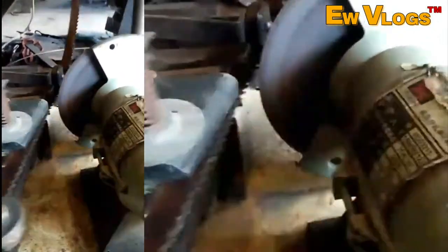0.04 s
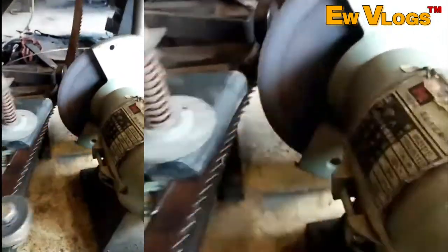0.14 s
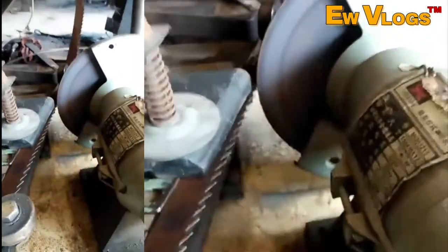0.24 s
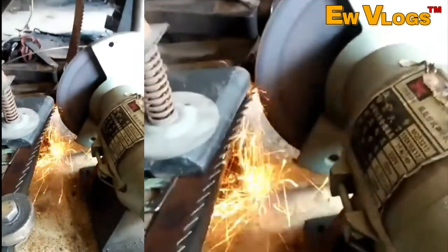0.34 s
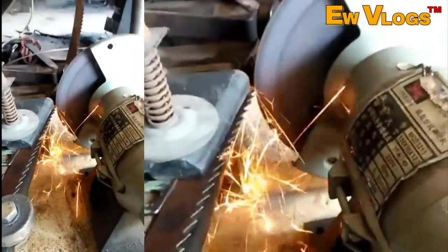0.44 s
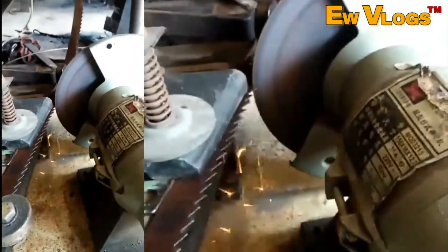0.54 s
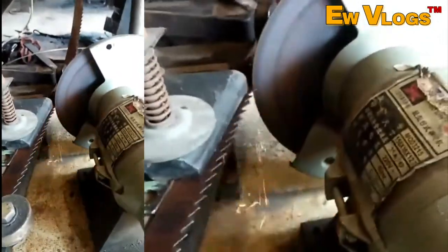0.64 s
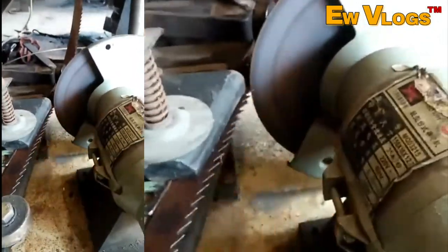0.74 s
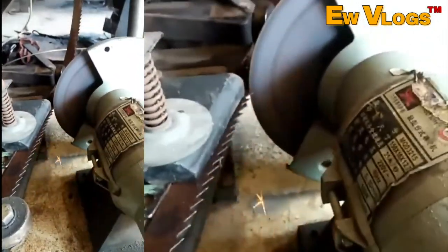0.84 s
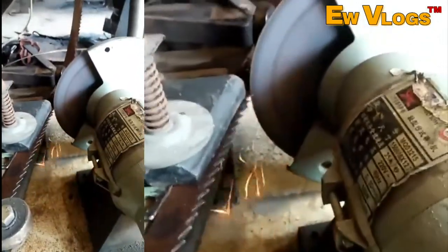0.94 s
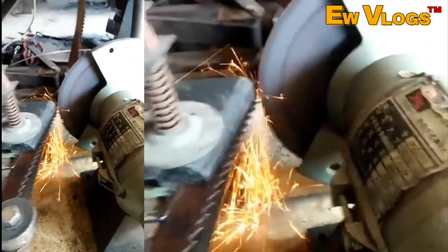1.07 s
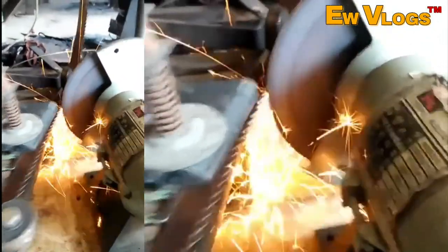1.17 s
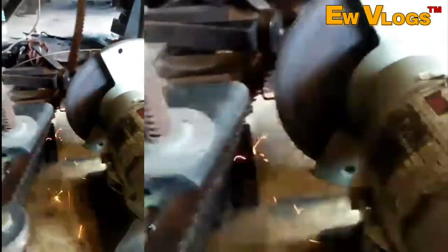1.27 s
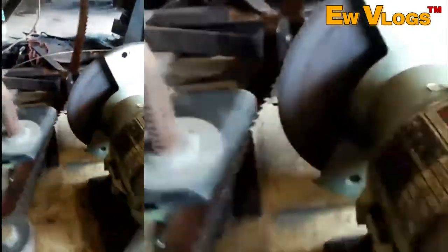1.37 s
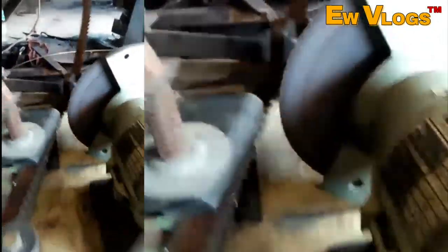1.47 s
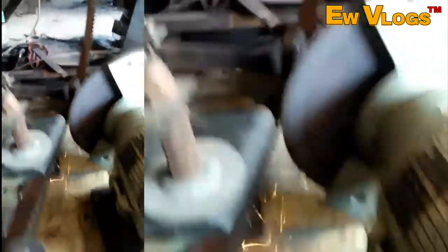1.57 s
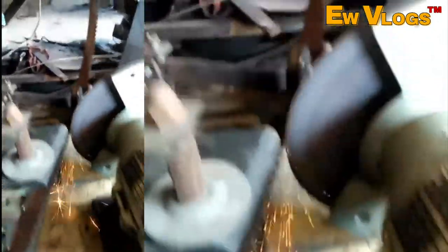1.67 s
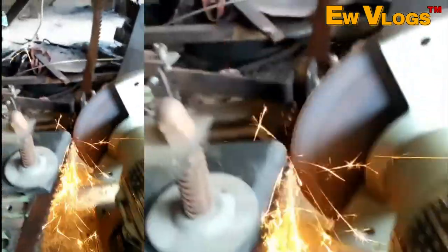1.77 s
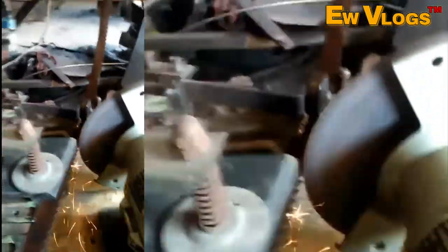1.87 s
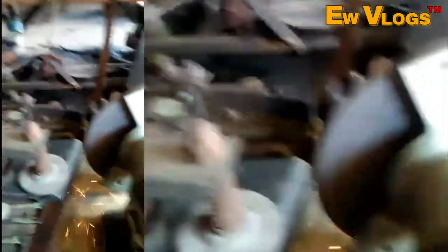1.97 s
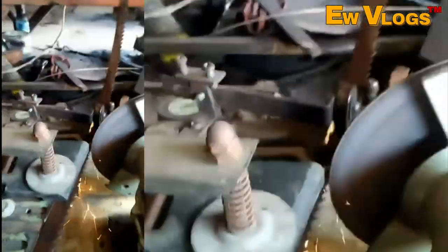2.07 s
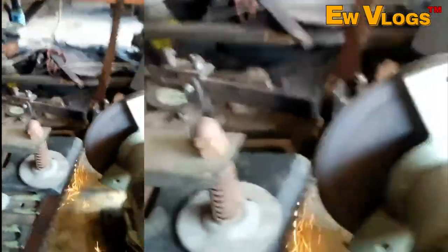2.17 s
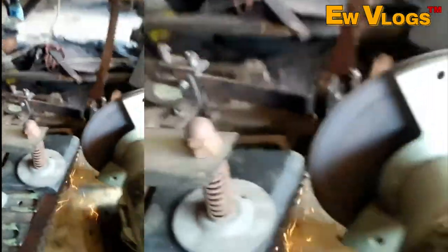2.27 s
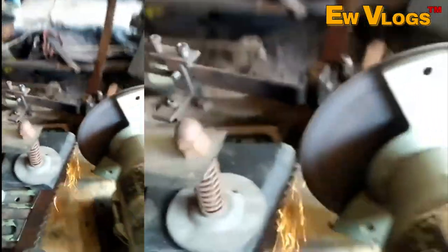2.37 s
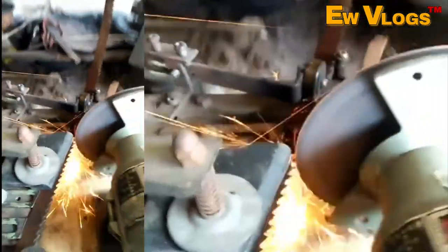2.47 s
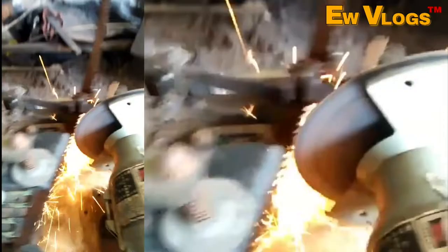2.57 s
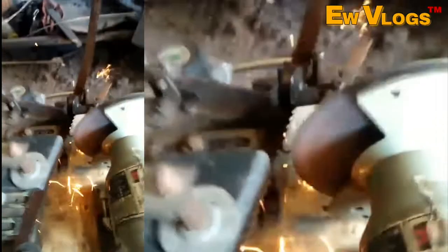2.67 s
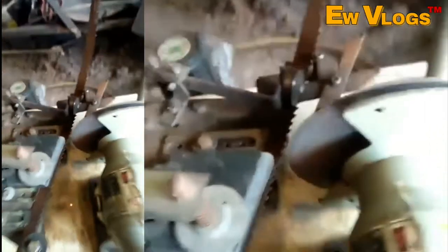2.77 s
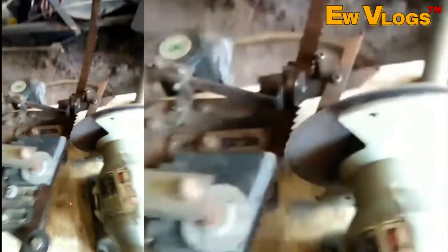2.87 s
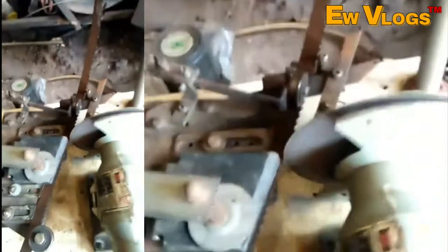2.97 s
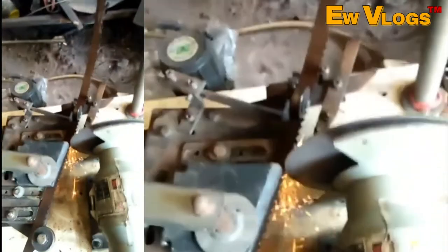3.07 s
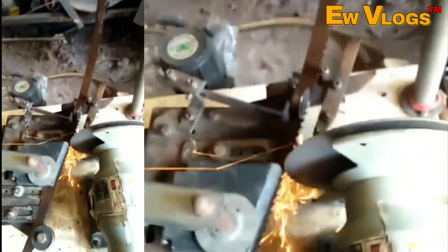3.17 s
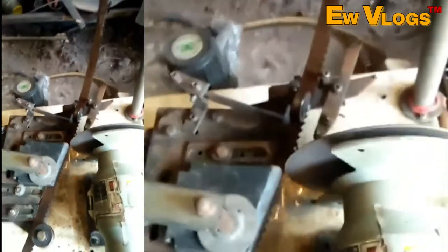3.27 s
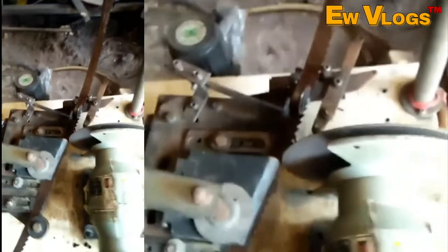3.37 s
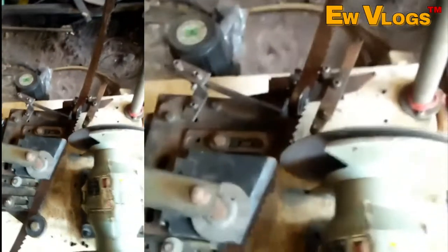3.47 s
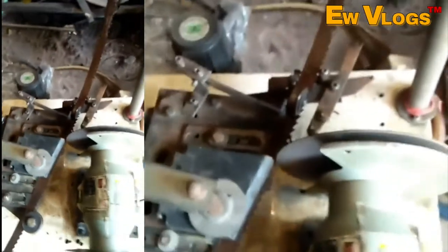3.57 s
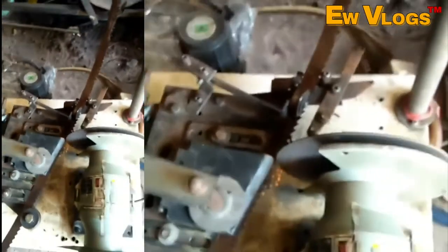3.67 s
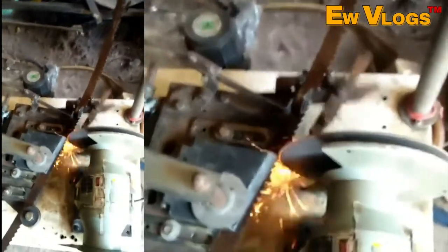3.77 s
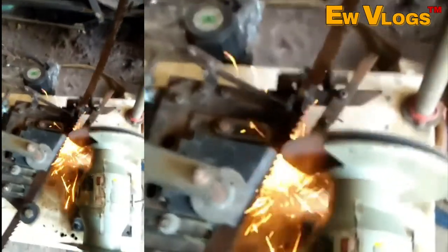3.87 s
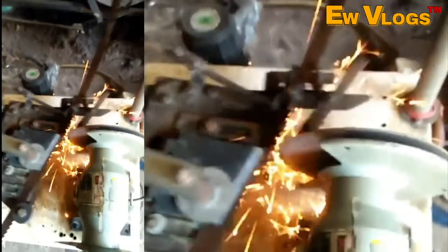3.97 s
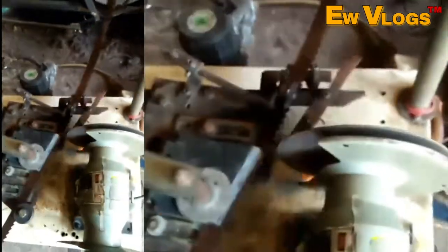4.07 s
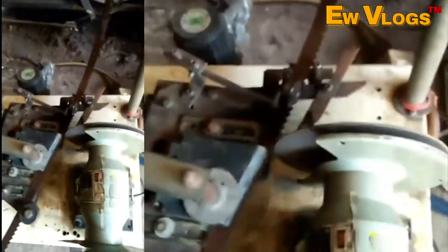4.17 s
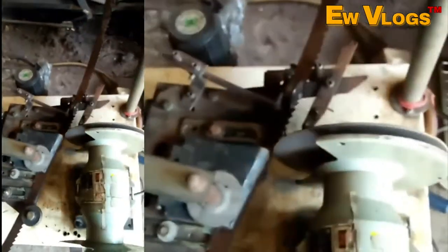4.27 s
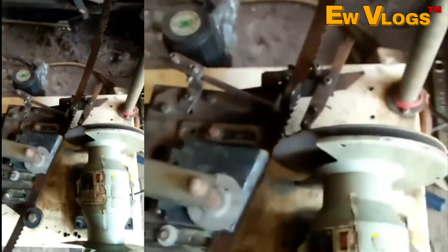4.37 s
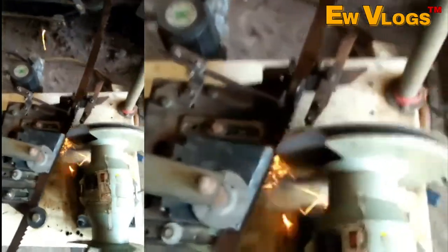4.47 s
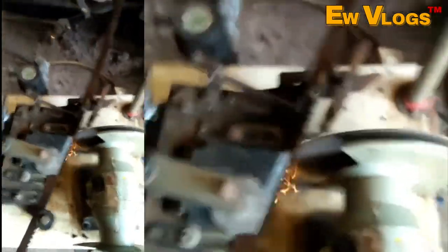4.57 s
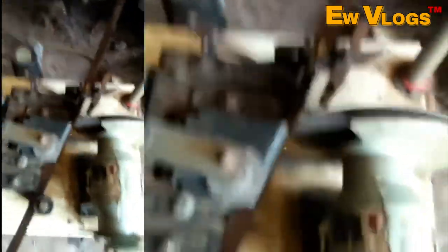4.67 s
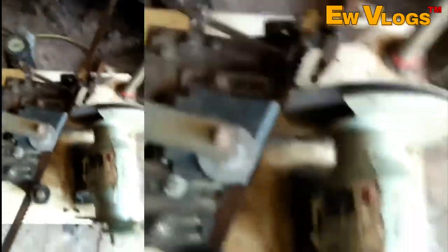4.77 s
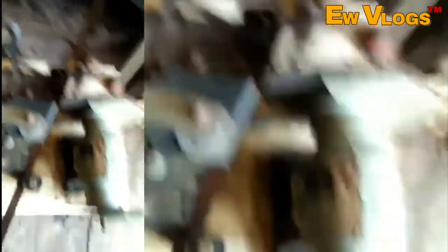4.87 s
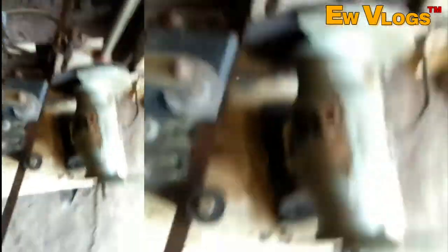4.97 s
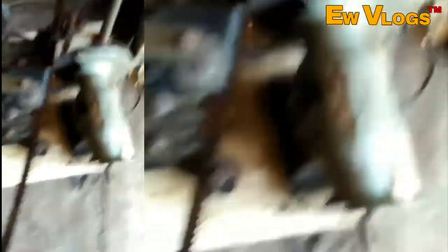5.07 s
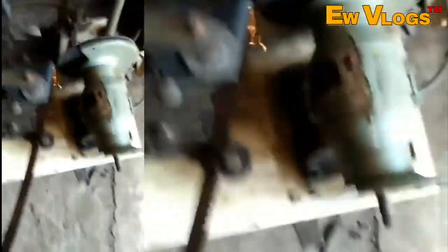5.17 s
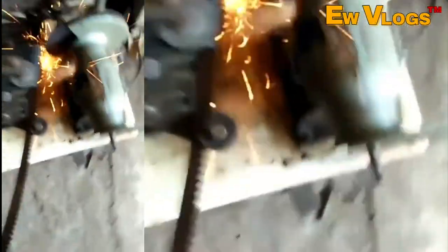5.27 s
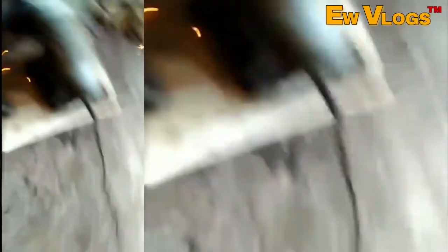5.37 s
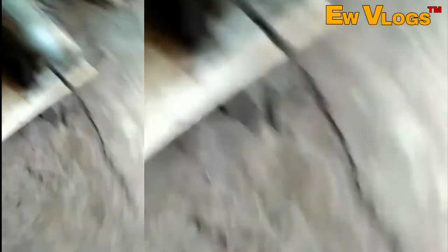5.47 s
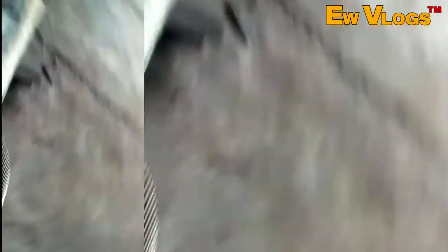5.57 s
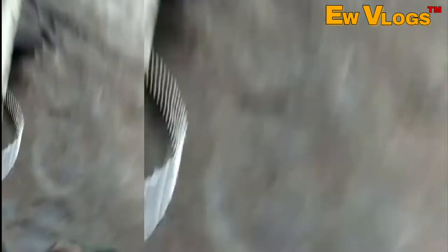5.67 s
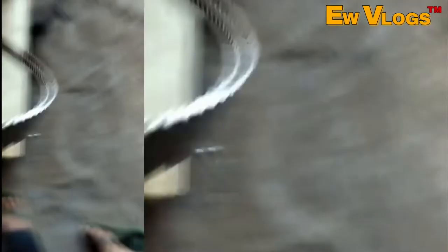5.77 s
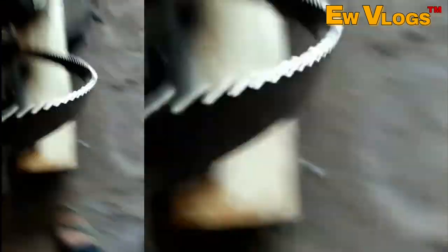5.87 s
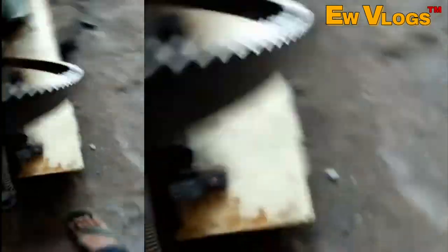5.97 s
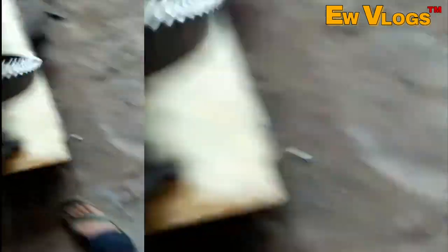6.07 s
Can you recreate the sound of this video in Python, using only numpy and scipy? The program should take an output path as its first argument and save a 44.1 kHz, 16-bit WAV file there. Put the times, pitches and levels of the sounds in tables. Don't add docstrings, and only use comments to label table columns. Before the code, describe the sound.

Gritty metal grinding comes in separate bites: two long roaring ones early, the first thinning into a regular fast buzz with a thin high squeal, then rapid light scuffs broken by brief, loud rasps. The steel blade rings, walls return a short diffuse echo, and a motor rumbles quietly beneath with mechanical clinks and dull knocks. Close microphone, overloaded at the peaks.

```python
import sys
import numpy as np
from scipy import signal
from scipy.io import wavfile
from scipy.ndimage import uniform_filter1d

SR = 44100
rng = np.random.default_rng(int(sys.argv[2]) if len(sys.argv) > 2 else 0)


def natural_amplitude(level_db):
    exponent = np.asarray(level_db, float) / 20
    return 10 ** exponent


def wav_record(signal):
    frames = np.transpose(np.atleast_2d(signal))
    bounded = np.clip(frames, -1, 1)
    quanta = np.round(bounded * 32767).astype(np.int16)
    wavfile.write(sys.argv[1], SR, quanta)


N = 269449

TURNS_PER_S = 49.4
# (time [s], lead [turns])
LAG = [(.5, 0.34), (.65, 0.27), (.75, 0.12), (1.25, 0.16), (1.75, -0.28), (1.85, -0.23), (2.05, -.52),
       (2.65, -0.95), (5.95, -0.16)]

# (time [s], level [dB], pressure [0-1], plunge into the gullet [0-1])
LONG_CUT_1 = [
    (.5, 1, 0.82, 0.24),
    (.6, -1, 0.68, 0.16),
    (.75, 0, 0.44, 0.12),
    (.95, -4, 0.36, 0.28),
    (1.08, -2.5, 0.36, 0.15),
    (1.2, -1, 0.44, 0.39),
    (1.26, 3.5, 0.4, 0.26),
    (1.327, -2.5, 1, 0.72),
    (1.41, 1, 1, 0),
]
LONG_CUT_2 = [
    (1.744, 1, 0.59, 0.39),
    (1.83, 2.5, 0.49, 0.39),
    (1.92, -0.5, 0.95, 0.48),
    (2.05, 0.4, 0.73, 0.29),
    (2.18, 2.5, 0.46, 0.4),
    (2.46, -0.9, 0.69, 0.38),
    (2.55, 4, 0.56, 0.28),
    (2.694, -1, 0.77, 0.59),
    (2.782, 1.5, 0.76, 0.033),
]
SHORT_CUTS = [
    [(0.0, 1.5, 0.88, 0.71), (.03, -7, 0.83, 0.32), (.12, -16.5, 0.55, 0.22)],
    [(3.985, 2.9, 0.59, 0.38), (4.062, -1.7, 0.93, 0.62), (4.14, 1.7, 0.43, 0.042)],
    [(5.362, 4, 0.49, 0.23), (5.431, -4, 1, 0.43), (5.501, -1.5, 0.67, 0.26), (5.57, -11.5, 1, 0.5)],
    [(5.963, 0.29, 0.53, 0.24), (6.036, 0, 0.69, 0.049), (6.11, 1, 0.4, 0.39)],
]
# (light flat touch [dB], added by full pressure [dB], added by full plunge [dB])
CUT_DB = np.array([(-6.5, -9.0, -8.0), (-9.5, 4.0, -12.5), (-22.5, 5.5, 18.0)])
BITE_SHARE = np.array([[.65], [1.], [1.1]])
FILL_POWER = np.array([[1.8], [1.8], [1.1]])
BLOW = np.array([[10.], [10.], [4.]])
# (time [s], half length [s], loss [dB])
LIFTS = [
    (0.766, 0.0066, 4),
    (1.82, .006, 10),
    (2.15, 0.0045, 12),
    (2.207, 0.0045, 5),
    (2.255, .005, 5),
    (2.284, .004, 1),
    (2.514, 0.0087, 3),
    (2.537, 0.0086, 8),
    (2.578, 0.0048, 21),
    (2.62, .006, 12),
]

# (time [s], level [dB], grip [0-1])
FIRST_TOUCHES = [
    (.4225, -15.5, 0.59),
    (.4623, -13.5, 0.43),
    (1.729, -15, 0.63),
]
# (time [s], level [dB], grip [0-1])
GLANCING_TOUCHES = [(3.2455, -19, 0.65), (3.2615, -10.5, 0.6), (3.3255, -14, 0.57), (3.336, -13, 0.6),
                    (3.3735, -13, 0.47), (3.345, -19, 0.7), (3.4015, -7.5, 0.3), (3.4427, -12, 0),
                    (3.7356, -12, 0.3), (3.7554, -16.5, 0.55), (3.788, -10, 0.48), (3.7955, -16, 0.1),
                    (3.817, -23, 0), (3.8252, -18.5, 0.74), (3.836, -14, 0.1), (3.868, -16, 0),
                    (3.8973, -21, 0.2), (3.908, -9.5, 0.37), (3.9146, -22, 1), (3.9475, -10, 0.64),
                    (3.968, -13, 0.87),
                    (4.477, -27, 0.48), (4.516, -17, 0.37), (4.556, -19, 0.35), (4.598, -16, 0.3),
                 (4.61, -13, 0.87), (4.618, -8, 0.28), (4.638, -15, 0.58), (4.6493, -9, 0.77),
                 (4.661, -12, 0.47), (4.6827, -8, 0.59), (4.6995, -8, 0.41), (4.73, -16, 0.64),
                 (4.823, -20.5, 0.42), (4.862, -14.5, 0.16), (4.872, -18, 0.64), (4.955, -23, 0.055),
                 (4.9637, -30.5, .1), (4.993, -41, .1), (5.076, -43, .1),
                    (5.115, -32, 0.2), (5.127, -39, 0.24), (5.155, -18.5, 0.21), (5.165, -17.5, 0.15),
                  (5.195, -17.5, 0.53), (5.205, -14, 0.39), (5.226, -28, 0.52), (5.2778, -17.5, 0.62),
                  (5.2841, -9.5, 0.33), (5.326, -18, 0.61), (5.3367, -8.5, 0.31), (5.347, -13.5, 0.78)]
# (time [s], level [dB], grip [0-1], length against a glancing touch [1])
SKIMS = [(3.2513, -2.5, 0.27, 1.05), (3.2706, -7, 0.59, 1.05), (3.2896, -5.5, 0.5, 1.05),
         (3.3112, -9, 0.63, 1.05), (3.3294, -2, 0.4, 1.05), (3.3517, -11, 0.8, 1.05),
         (3.367, -0.5, 0.37, 1.05), (3.3943, -9, 0.4, 1.05), (3.4145, -4.5, 0.5, 1.05),
         (3.4324, -13, 0.46, 1.05), (3.454, -5, 0.57, 1.05), (3.475, -15.5, 0.83, 1.05),
         (3.495, -14, 0.45, 1.3), (3.5347, -7.5, 0.68, 1.05), (3.555, -10.5, 0.45, .9),
         (3.5952, -20, 0.44, 1.05), (3.616, -22, 0.5, 1.05), (4.6906, -5, 0.58, 1.05),
         (4.72, -6.5, 0.47, 1), (4.7403, -2, 0.4, 1.05), (4.759, -4, 0.51, 1.05), (4.78, -9, 0.5, 1.05),
         (4.7975, -6, 0.33, 1.3)]
SKIM_DB = -5
# (glancing touch [dB], added by full grip [dB])
TOUCH_DB = np.array([(-9.0, 3.0), (-14.5, 21.0), (-35.0, 34.5)])
TOUCH_S = np.array([[.0026], [.0032], [.0032]])
HEAD_ON_S, LEAD_SHARE = 0.0014, .6
DRAG, DRAG_S = 0.4, 0.014
# (start [s], end [s], fizz level [dB], rise and fall [s])
BRUSHES = [
    (3.227, 3.507, -38, 0.022),
    (3.52, 3.662, -58, .03),
    (3.714, 3.926, -44.5, .015),
    (4.445, 4.6, -56.5, 0.015),
    (4.6, 4.9, -42, 0.021),
    (4.95, 5.364, -55, .06),
]
BRUSH_DB = np.array([[0.], [9.], [-12.]])

# (frequency [Hz], width [Hz], level [dB])
RING_1 = [(935, 450, -2.5), (2180, 30, -5), (2590, 30, -30), (6800, 77, -28), (7650, 230, -20.5),
          (8500, 52, -17.5), (9020, 37, -24), (1975, 85, 6.5), (4880, 90, -12), (5670, 50, -12),
          (5795, 8, 3), (6110, 90, -11)]
RING_2 = [(592, 7.6, -4), (877, 400, -7), (1430, 53, -31), (1984, 45, -0.5), (2500, 160, -11),
          (2970, 19, -6.5), (3870, 69, -27), (4110, 14, -55), (4700, 57, -46), (6050, 23, -14),
          (5980, 130, -33)]
RING_4 = [(833, 68, -2.5), (1480, 51, -7.5), (1925, 52, -4.5), (2234, 33, 3.5), (2440, 27, 0),
          (4400, 190, -35.5), (6040, 310, -21), (6790, 250, -18), (7600, 110, -25), (8060, 45, -14),
          (8900, 160, -40)]
RING_5 = [(928, 27, -1), (1440, 220, -17.5), (1930, 81, -5.5), (2264, 14, -0.5), (2480, 31, -29),
          (2600, 24, -12), (5740, 27, -19), (6050, 54, -22), (6790, 95, -18), (7660, 140, -22.5),
          (8100, 120, -24)]
RING_6 = [(1923, 130, 2.5), (2300, 22, 2), (2350, 18, -5), (4700, 25, -25), (4810, 59, -10.5),
          (5810, 35, -12), (6800, 85, -19.5), (7760, 44, -11), (7940, 69, -17), (8200, 36, -20),
          (9100, 200, -17.5)]
RING_7 = [(944, 440, -7), (2780, 380, -22), (1435, 65, -6), (1903, 14, 8.5), (2076, 39, -2),
          (4840, 69, -16.5), (5740, 35, -46), (6110, 92, -13), (6810, 180, -18), (7460, 95, -16),
          (8390, 42, -13)]
RING_8 = [(926, 370, 2), (2257, 35, 4.5), (6920, 120, -33), (7630, 200, -16.5), (8400, 220, -17.5),
          (8770, 130, -17), (1940, 360, 3), (4800, 360, -12), (5600, 69, -22), (5740, 170, -6),
          (5950, 260, -9.5)]
RING_9 = [(600, 29, -3), (854, 310, -2.5), (1514, 110, -9), (1860, 34, -10.5), (2500, 57, -1),
          (3055, 20, -7), (4730, 130, -25), (6080, 200, -16), (7200, 71, -23), (7500, 89, -33),
          (8600, 110, -30)]
RING_10 = [(970, 21, -2), (1460, 180, -14), (1944, 94, 0), (2245, 16, 7), (4920, 130, -20),
           (5850, 110, -15), (6800, 90, -15.5), (8000, 200, -19), (8100, 150, -16), (9050, 280, -16)]
RING_11 = [(770, 30, -4.5), (923, 45, 0.5), (1420, 150, -19), (1920, 49, 4.5), (2430, 30, -22),
           (3030, 52, -14), (4650, 62, -17), (6100, 57, -14), (7300, 36, -14), (8160, 66, -15)]
RING_12 = [(1016, 120, -6), (1260, 21, 0), (1480, 34, 4), (1970, 140, -3), (2384, 38, 3.5), (2680, 50, -7),
           (3760, 50, -23.5), (4910, 120, -17.5), (5500, 72, -17), (6940, 78, -19), (7530, 58, -26)]
RING_13 = [(1050, 110, 3.5), (1470, 43, -5), (2000, 130, 5), (2180, 32, 0), (2450, 140, 7), (3010, 27, -3),
           (3890, 81, -19), (4900, 70, -19), (5650, 51, -12), (6120, 40, -10), (6880, 55, -16),
           (8350, 130, -15)]
RING_14 = [(1023, 130, 3), (1486, 56, -13), (2016, 230, -0.5), (2456, 124, 3.5), (3850, 68, -16),
           (4865, 67, -9.5), (5600, 40, -19), (5920, 190, -17.5), (6900, 78, -27), (7560, 96, -21),
           (8320, 110, -18)]
# (frequency [Hz], width [Hz], level [dB])
GUARD = [(10000, 94, -2), (11000, 99, -1), (11600, 150, -2), (12470, 190, -3.5)]
# (frequency [Hz], level [dB per Hz])
GRIT = [(59, -53), (100, -35.5), (363, -11.5), (590, -4), (669, -8.5), (1040, -2.5), (1660, -1.5),
        (1970, 0.5), (2480, 1), (3330, -22.5), (5900, -19.5), (6550, -17.5), (10700, -25.5), (14800, -39.5),
        (15700, -44)]
SKIM = [(100, -15.5), (600, -9), (900, -6), (1400, -11.5), (2300, -0.5), (3100, -21.5), (3500, -31.5),
        (5100, -22.5), (5600, -17), (8800, -19), (9700, -23.5), (10500, -18.5), (13200, -24.5),
        (14000, -44), (15600, -45)]
GRAZE = [(100, -14), (600, -11.5), (900, 0), (1400, -19), (2300, -4), (3000, -24.5), (3500, -34.5),
         (5000, -28), (5600, -21.5), (8800, -21), (9500, -30.5), (10500, -24), (13200, -29), (14000, -46),
         (15600, -42)]
FAINT = [(100, -14), (900, -14), (2300, -8), (3000, -29), (4000, -48), (5100, -48), (5600, -12),
         (7500, -26), (10000, -24), (13200, -25), (15600, -43)]
# (resonances [Hz, Hz, dB], grit noise [Hz, dB per Hz])
RINGS = [(RING_11, GRIT), (RING_1, GRIT), (RING_8, GRIT), (RING_7, GRIT), (RING_12, GRIT), (RING_2, GRIT),
         (RING_9, GRIT), (RING_13, GRIT), (RING_14, GRIT), (RING_2, GRIT), (RING_4, SKIM), (RING_7, GRIT),
         (RING_5, FAINT), (RING_5, GRAZE), (RING_10, GRAZE), (RING_7, GRIT), (RING_6, GRIT)]
# (damping factor [1], echo [dB], guard [dB])
STAGES = [(8.2, -4, -44), (6.7, -9, -23.5), (1.4, -11, -19), (6.5, -6, -31), (1.9, -14, -25.5),
          (5.7, -12.5, -33), (2, -10.5, -25), (2.5, -8, -20), (2.1, -8, -21), (4.6, -7.5, -41),
          (1.9, -11, -31), (14, -5.5, -26), (5, -14, -29), (3.2, -16, -30), (3.9, -14.5, -26),
          (7, -4.5, -35), (6.4, -4.5, -19.5)]
STARTS = [0, .4, .726, 1.27, 1.7, 1.87, 2.1, 2.27, 2.39, 2.64, 3.2, 3.984, 4.4, 4.604, 5.0, 5.361, 5.9, N /
          SR]

# (frequency [Hz], t60 [s])
SHOP = [(200, 0.092), (700, 0.48), (1700, 0.59), (4600, 0.47), (9000, 0.45), (12000, 0.34), (15000, 0.42)]

# (frequency [Hz], level [dB per Hz])
IDLE = [(24, -63.5), (40, -52), (85, -24), (170, -21.5), (298, -5), (355, -26), (568, -1.5), (1000, 9.5),
        (1530, 2.5), (1690, 2.5), (1870, -4), (2920, -9.5), (3220, -22), (7870, -34), (9500, -39),
        (15000, -44)]
# (time [s], level [dB])
IDLE_DB = [(0, -44), (.4, -35), (1.7, -28), (3.1, -31), (3.7, -24.5), (4.45, -35), (5.05, -39.5),
           (5.9, -36)]
# (frequency [Hz], width [Hz], level [dB])
DRONE = [(308.5, 7, -51), (450, 24, -41.5), (587, 17, -43), (759, 35, -38.5), (947, 15, -40),
         (1242, 8.6, -44.5)]
WANDER, WAVER_DB = .03, 3.
# (time [s], peak level [dB], pitch [Hz], t60 [s])
CLINKS = [(0.413, -18.5, 740, 0.098), (0.497, -12, 920, 0.15), (2.753, 0.5, 2637, 0.069),
          (3.005, -15.5, 780, 0.083), (3.146, -21, 1020, 0.037), (3.165, -19, 1000, 0.031),
          (3.226, -21, 1194, 0.12), (3.6, -39, 430, 0.32), (3.658, -23, 464, 0.35),
          (3.949, 3.5, 1010, 0.0068), (4.485, -22, 950, 0.063), (5.875, -25, 1220, 0.15),
          (5.944, -16, 694, 0.021)]
# (time [s], peak level [dB], pitch [Hz], t60 [s])
THUMPS = [
    (0.594, -26, 125, 0.078),
    (1.292, -11, 220, 0.029),
    (1.349, -23, 178, 0.05),
    (2.098, -4, 107, 0.029),
    (2.409, -28, 100, 0.1),
    (2.656, -38, 164, 0.11),
    (3.944, -7.5, 200, 0.014),
    (4.029, -39, 171, 0.096),
    (5.429, -18, 108, 0.12),
]

# (time [s], level [dB])
SQUEAL = [(.5, -36), (.72, -41), (.9, -31), (1.0, -25), (1.15, -15), (1.215, -22), (1.26, -36)]
SQUEAL_HZ, SQUEAL_FADE_DB = 5797.5, 10.
# (time [s], level [dB])
BEADS = [(.72, -16), (.8, -6.5), (.95, -12), (1.0, -5.5), (1.18, -5.5), (1.26, -12)]
BEAD_TURN = 0.04006
# (frequency [Hz], level [dB], t60 [s], rise [s])
BEAD_MODES = [(1980, 1.5, 0.042, 0.0017), (2140, -6.5, 0.037, 0.0013), (4860, -9, .04, .0006),
              (5810, -3.5, 0.049, 0.00035), (6100, -5.5, 0.019, 0.00023)]


def read(points, hz):
    f, value = np.transpose(points)
    return np.interp(np.log(hz + 1), np.log(f + 1), value)


def evened(x):
    return x / np.sqrt(np.mean(x ** 2) + 1e-20)


def add(mix, s, sound):
    at = round(s * SR)
    part = mix[..., at:at + sound.shape[-1]]
    part += sound[..., :part.shape[-1]]


def noise_field(db_of, frames, size):
    hz = np.fft.rfftfreq(size, 1 / SR)
    a, b, c = rng.standard_normal((frames, len(hz), 3)).T
    spectra = (a + 1j * b) * natural_amplitude(db_of(hz[:, None], c))
    return signal.istft(spectra, nperseg=size, noverlap=size * 3 // 4)[1]


def high_spot(t):
    return (TURNS_PER_S * t + np.interp(t, *np.transpose(LAG)) - .035) % 1


def chatter(blows):
    bounces = np.zeros(111)
    bounces[::22] = np.hanning(8)[1:-1]
    fizz, blade, frame = blows
    return np.array([fizz, np.convolve(blade, bounces)[:blows.shape[1]], frame])


def cuts(fresh):
    t, force = np.arange(N) / SR, np.zeros((3, N))
    angle = high_spot(t)
    face = rng.standard_normal(893)[(angle * 893).astype(int)]
    landed = np.diff(angle > .02, prepend=True) & (angle > .02)
    blows = chatter(BLOW * landed)
    for rows in [LONG_CUT_1, LONG_CUT_2] + SHORT_CUTS:
        s, *columns = np.transpose(rows)
        now = slice(round(s[0] * SR), round(s[-1] * SR))
        db, press, plunge = (np.interp(t[now], s, c) for c in columns)
        press = np.clip(press, .02, 1)
        width = BITE_SHARE * (0.096 + 0.78 * press)
        bite = np.tanh(angle[now] / 0.0053) * np.exp(-(angle[now] / width) ** 4)
        fill = press ** FILL_POWER
        release = np.clip((s[-1] - t[now]) / 0.036, 0, 1)
        shape = (fill + (1 - fill) * bite) * release
        same = .95 - .8 * press
        grit = np.sqrt(same) * face[now] + np.sqrt(1 - same) * fresh[now]
        grit = grit + 0.71 * (1 - press) ** 2 * blows[:, now]
        add(force, s[0], grit * shape * natural_amplitude(db + CUT_DB @ [np.ones_like(db), press, plunge]))
    for s, half, db in LIFTS:
        force = force * natural_amplitude(-db * np.exp(-((t - s) / half) ** 2))
    return force


def causal(gain):
    log = np.log(np.maximum(np.r_[gain, gain[-2:0:-1]], 1e-5))
    taps = np.fft.ifft(np.exp(np.conj(signal.hilbert(log)))).real[:4096]
    return taps / np.linalg.norm(taps)


def steel(modes, grit, damping, grit_db=-10, wider=1.0, per_khz=4.9, low_hz=1650, high_hz=3300):
    hz = np.fft.rfftfreq(8192, 1 / SR)
    power = natural_amplitude(2 * (read(grit, hz) + grit_db))
    for f, width, db in modes:
        damped = wider * width + damping * per_khz * f / 1000
        power += natural_amplitude(2 * db) * width / damped / (1 + (2 * (hz - f) / damped) ** 2) ** 2
    frame = 1 / (1 + (hz / low_hz) ** 12)
    fizz = 1 - 1 / (1 + (hz / high_hz) ** 12)
    blade = abs(1 - frame - fizz)
    return np.array([causal(np.sqrt(power * share)) for share in (fizz, blade, frame)])


def grinding(grain_db=1.5, far_damping=5.2):
    fresh = evened(rng.standard_normal(N) * natural_amplitude(grain_db * rng.exponential(1, N)))
    force, near, far = cuts(fresh) + touches(fresh), np.zeros(N), np.zeros(N)
    for (modes, grit), (damping, echo_db, guard_db), s, end in zip(RINGS, STAGES, STARTS, STARTS[1:]):
        modes = modes + [(hz, width, db + guard_db) for hz, width, db in GUARD]
        part = force[:, round(s * SR):round(end * SR)]
        close = steel(modes, grit, damping)
        blurred = steel(modes, grit, damping + far_damping)
        add(near, s, signal.oaconvolve(part, close, axes=1).sum(0))
        add(far, s, natural_amplitude(echo_db) * signal.oaconvolve(part, blurred, axes=1).sum(0))
    return near, far


def unsteady(x, spread_db=2.):
    t, z = signal.stft(x, SR, nperseg=512, noverlap=384)[1:]
    patches = uniform_filter1d(rng.standard_normal(z.shape[::-1]).T, size=3, axis=0)
    patches = evened(uniform_filter1d(patches, size=20, axis=1))
    regular = (t > BEADS[0][0]) & (t < BEADS[-1][0])
    spread = spread_db * np.where(regular, .3, 1)
    z = z * natural_amplitude(spread * patches - spread ** 2 / 9)
    return signal.istft(z, nperseg=512, noverlap=384)[1][:N]


def shop(x):
    t = np.arange(500) * 64 / SR
    tail = noise_field(lambda hz, c: -60 * t / np.maximum(read(SHOP, hz), .1), frames=500, size=256)
    tail *= np.clip((np.arange(len(tail)) / SR - .004) / 0.035, 0, 1)
    return signal.fftconvolve(x, tail / np.linalg.norm(tail))[:N]


def drone(t, hz, width, db):
    waver = evened(np.interp(t, np.linspace(0, t[-1], 25), rng.standard_normal(25)))
    drift = np.interp(t, np.linspace(0, t[-1], 31), rng.standard_normal(31))
    pitch = hz * (1 + WANDER * drift)
    poles = [np.exp(-2 * np.pi * width / SR)] * 2
    hum = signal.lfilter([1], np.poly(poles), [1, 1j] @ rng.standard_normal((2, N)))
    tone = (hum * np.exp(2j * np.pi * np.cumsum(pitch) / SR)).real
    return natural_amplitude(db + 29.5 + WAVER_DB * waver) * evened(tone)


def idle(patchy_db=1.4):
    t = np.arange(N) / SR

    def rumble_db(hz, c):
        patches = evened(uniform_filter1d(uniform_filter1d(c, 6, 0), 8, 1))
        return read(IDLE, hz) + patchy_db * patches

    out = evened(noise_field(rumble_db, frames=N // 256 + 5, size=1024)[:N])
    for hz, width, db in DRONE:
        out += drone(t, hz, width, db)
    out *= natural_amplitude(np.interp(t, *np.transpose(IDLE_DB)))
    u = t[:6000]
    for s, db, hz, t60 in CLINKS + THUMPS:
        decay = natural_amplitude(db - 60 * u / max(t60, .01))
        add(out, s, decay * np.tanh(u * hz / 0.46) * np.sin(2 * np.pi * hz * u))
    return out


def touches(fresh):
    u, force = np.arange(2000) / SR, np.zeros((3, N))
    hit = chatter(BLOW * (np.arange(len(u)) == 40))
    glancing = GLANCING_TOUCHES
    groups = [(FIRST_TOUCHES, .8, HEAD_ON_S), (glancing, .05, TOUCH_S)]
    for s, db, grip, stretch in SKIMS:
        groups.append(([(s, db + SKIM_DB, grip)], .06, stretch * TOUCH_S))
    for rows, blow, length in groups:
        swell = (u / length) ** 2 * np.exp(2 - 2 * u / length)
        trail = DRAG * np.tanh(u / length) * np.exp(-u / DRAG_S)
        for s, db, grip in rows:
            at = round(s * SR)
            scuff = (swell + trail) * fresh[at:at + len(u)]
            level = natural_amplitude(db + TOUCH_DB @ [[1], [grip]])
            add(force, s - LEAD_SHARE * np.min(length), (scuff + blow * hit) * level)
    t = np.arange(N) / SR
    for start, end, db, edge in BRUSHES:
        fade = np.clip(np.minimum(t - start, end - t) / edge, 0, 1)
        force += natural_amplitude(db + BRUSH_DB) * fresh * fade
    return force


def squeal():
    t = np.arange(N) / SR
    drift = uniform_filter1d(rng.standard_normal(N), size=2000)
    level_db = np.interp(t, *np.transpose(SQUEAL), left=-120, right=-120)
    level_db = level_db - SQUEAL_FADE_DB * high_spot(t)
    tone = np.sin(2 * np.pi * np.cumsum(SQUEAL_HZ + 150 * drift) / SR)
    return uniform_filter1d(natural_amplitude(level_db), size=30) * tone


def beads():
    t = np.arange(N) / SR
    landed = np.diff((high_spot(t) - BEAD_TURN) % 1, prepend=0) < -.5
    strikes = landed * natural_amplitude(np.interp(t, *np.transpose(BEADS), left=-120, right=-120))
    u, ring = t[:1200], 0
    for hz, db, t60, rise in BEAD_MODES:
        ring = ring + natural_amplitude(db - 60 * u / t60) * np.tanh(u / rise) * np.sin(2 * np.pi * hz * u)
    return signal.oaconvolve(strikes, ring)[:N]


def scene():
    near, far = grinding()
    return (unsteady(near) + beads() + squeal() + shop(far) + idle())[None]


def top_cut(x):
    return signal.sosfilt(signal.butter(12, 15730, fs=SR, output="sos"), x)


def record(dry):
    ceiling, knee = .72, 7.
    uneven = dry + 0.16 * np.tanh(dry ** 4)
    clipped = uneven / (1 + abs(uneven / ceiling) ** knee) ** (1 / knee)
    band = signal.firwin(1023, [22, 15720], pass_zero=False, fs=SR)
    mix = signal.oaconvolve(clipped, band[None], "same")
    return top_cut(mix)


dry = scene()
out = record(dry)
wav_record(out)
```